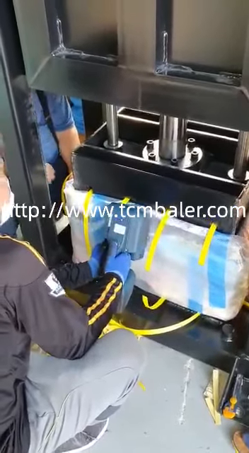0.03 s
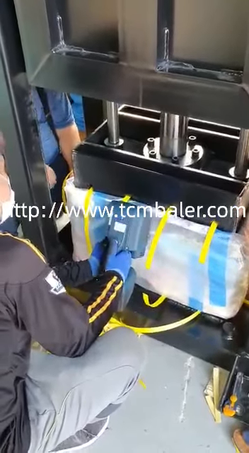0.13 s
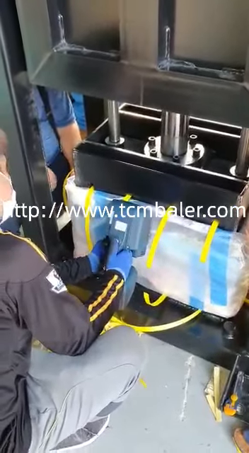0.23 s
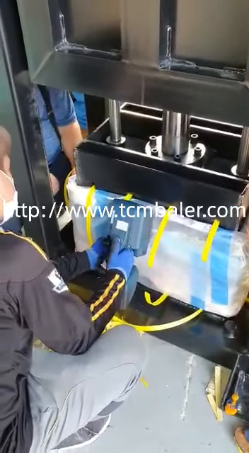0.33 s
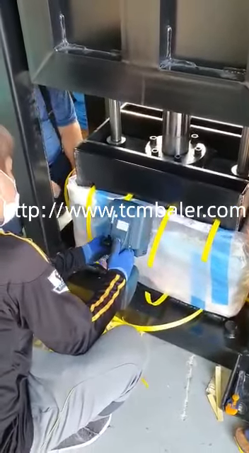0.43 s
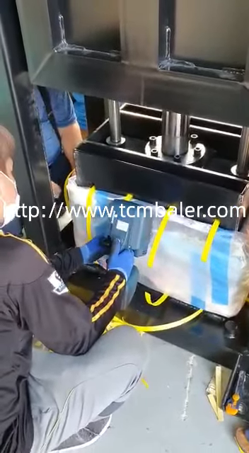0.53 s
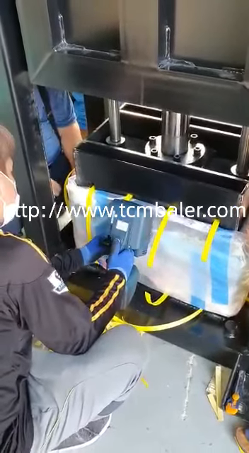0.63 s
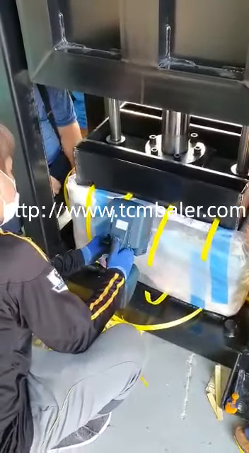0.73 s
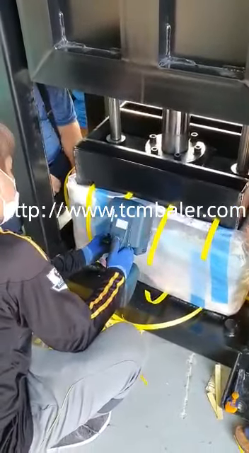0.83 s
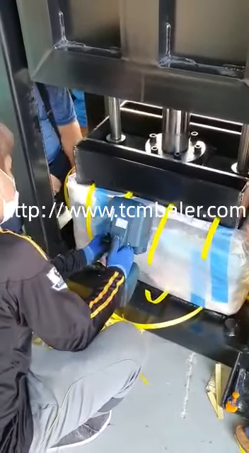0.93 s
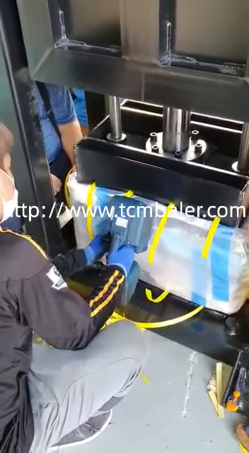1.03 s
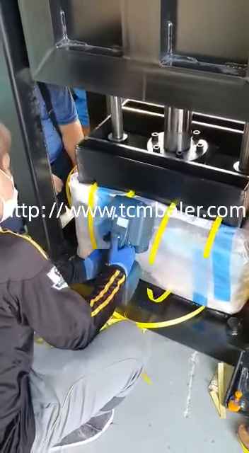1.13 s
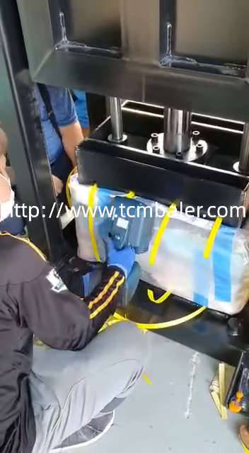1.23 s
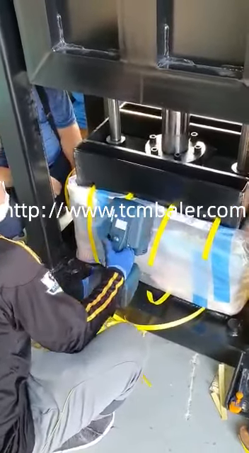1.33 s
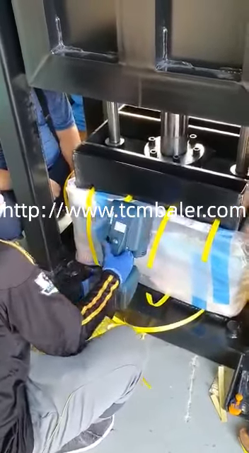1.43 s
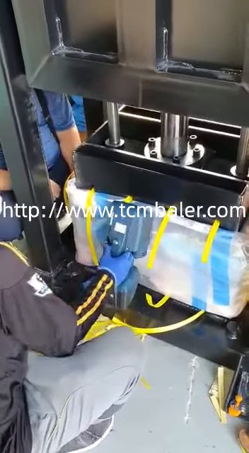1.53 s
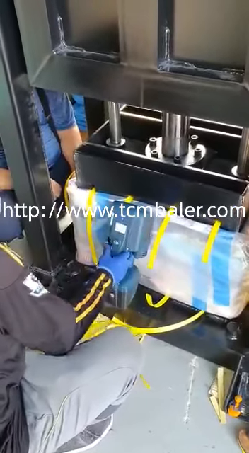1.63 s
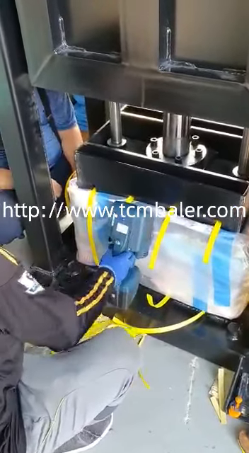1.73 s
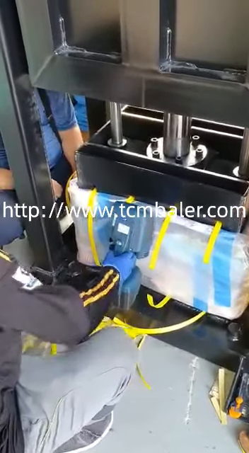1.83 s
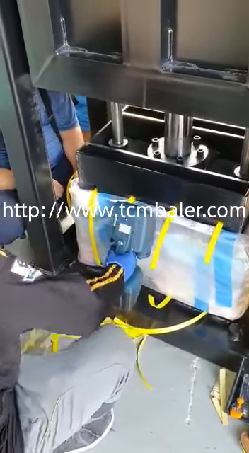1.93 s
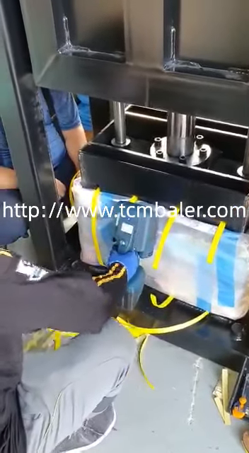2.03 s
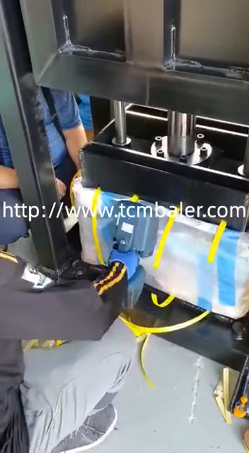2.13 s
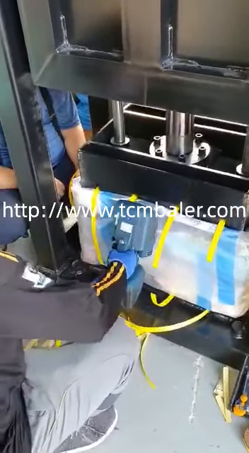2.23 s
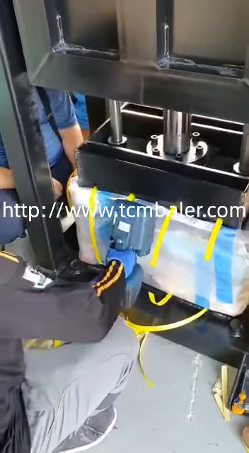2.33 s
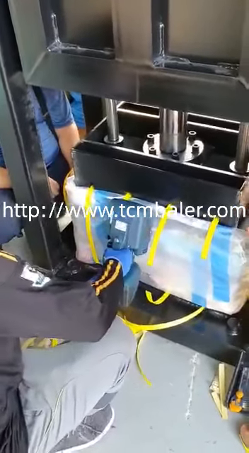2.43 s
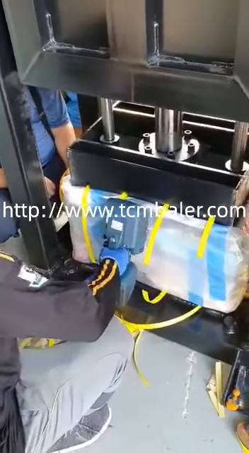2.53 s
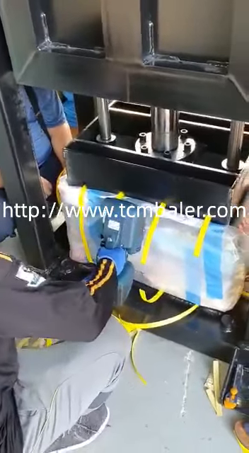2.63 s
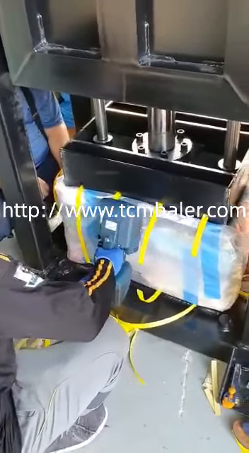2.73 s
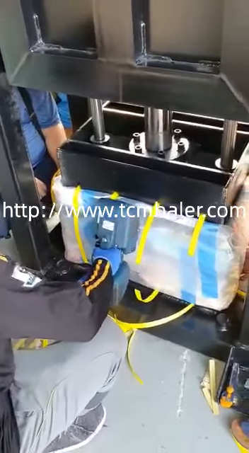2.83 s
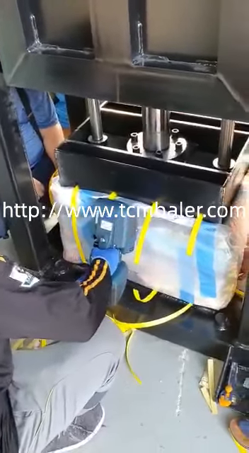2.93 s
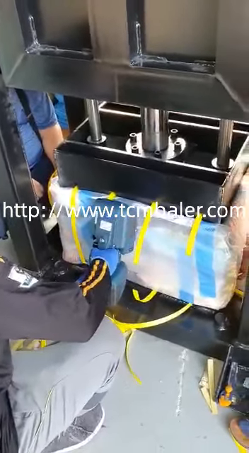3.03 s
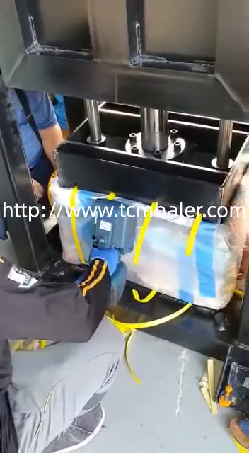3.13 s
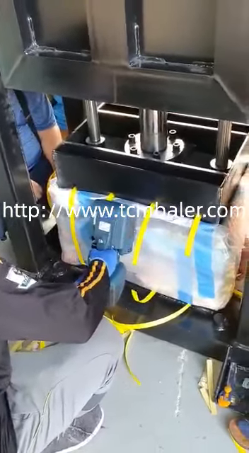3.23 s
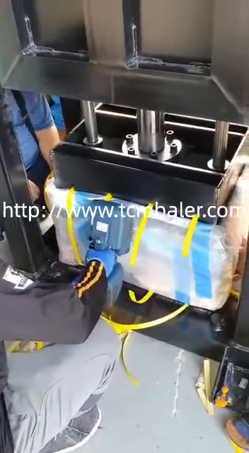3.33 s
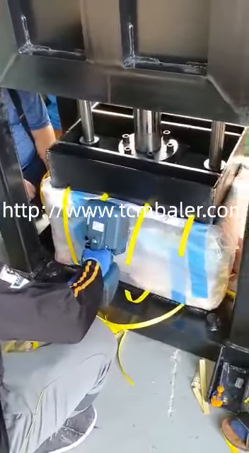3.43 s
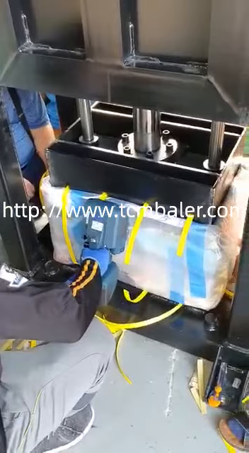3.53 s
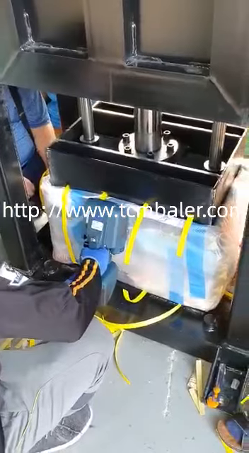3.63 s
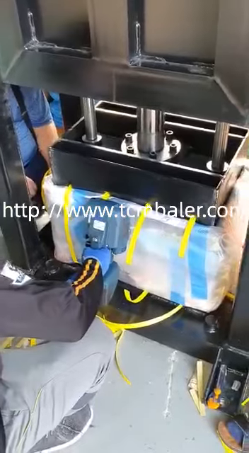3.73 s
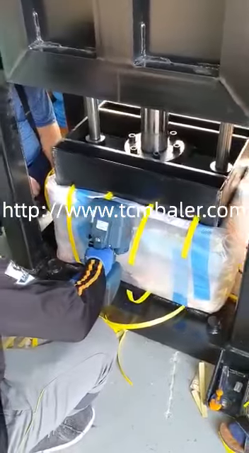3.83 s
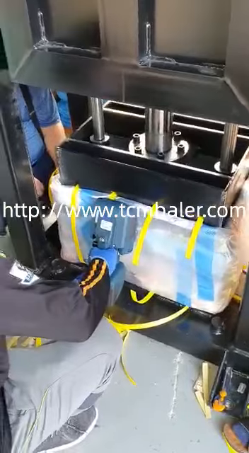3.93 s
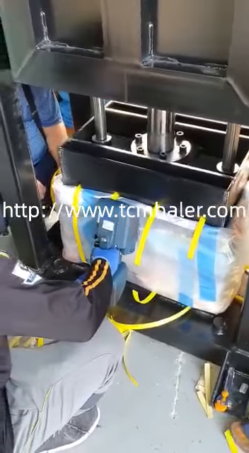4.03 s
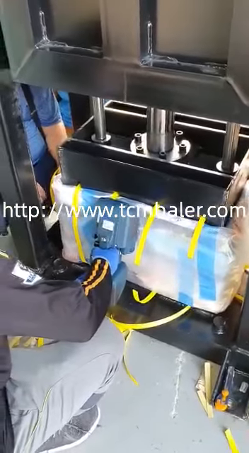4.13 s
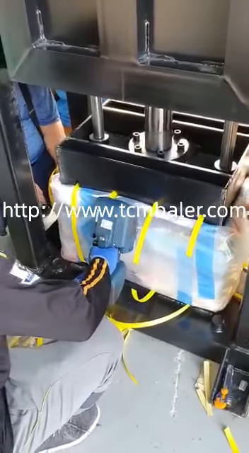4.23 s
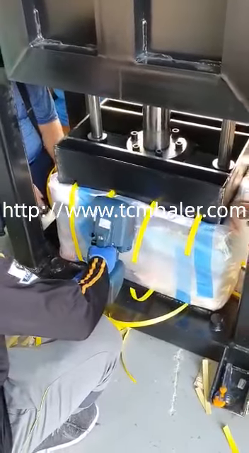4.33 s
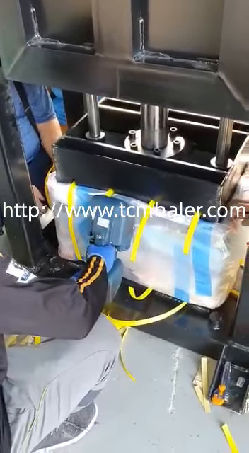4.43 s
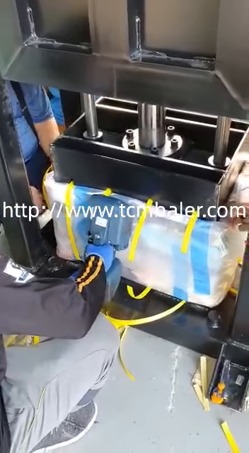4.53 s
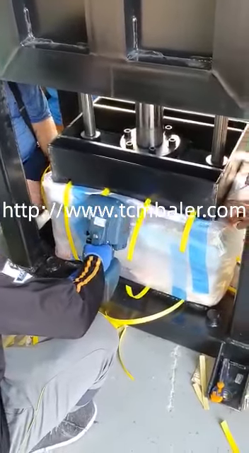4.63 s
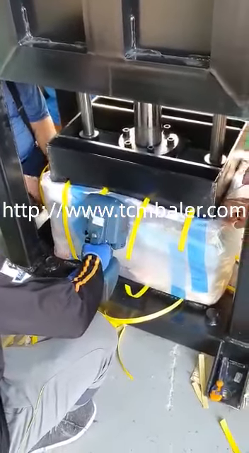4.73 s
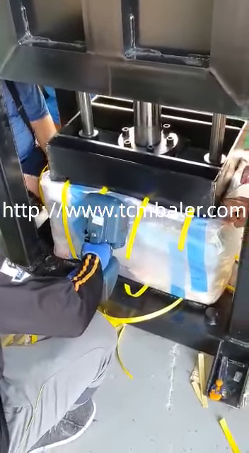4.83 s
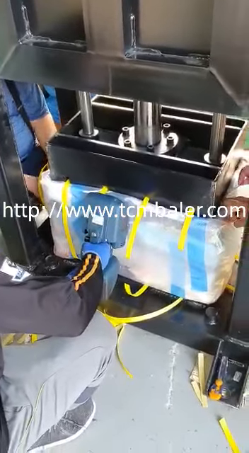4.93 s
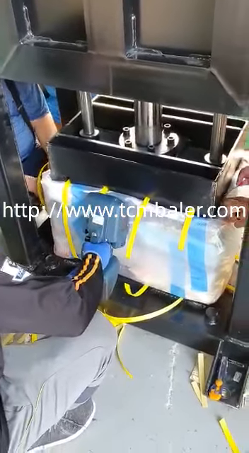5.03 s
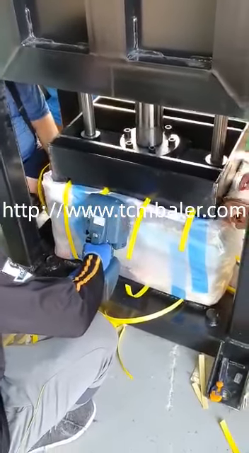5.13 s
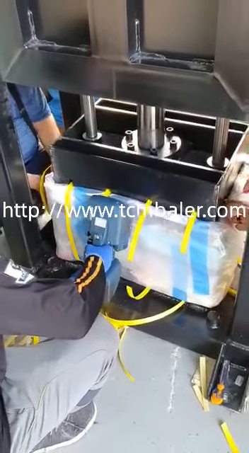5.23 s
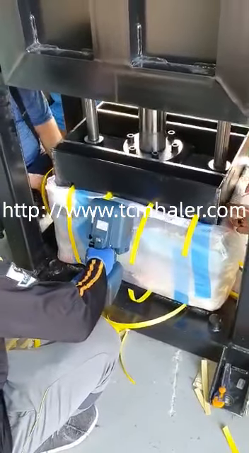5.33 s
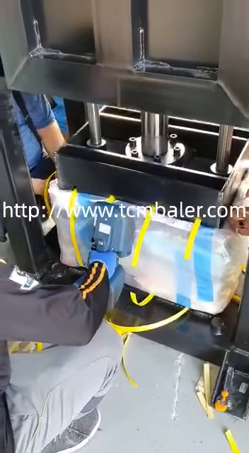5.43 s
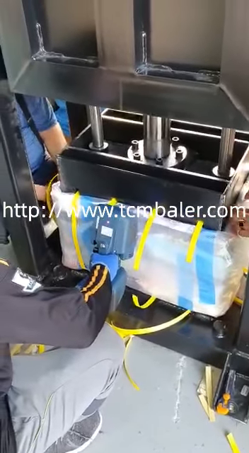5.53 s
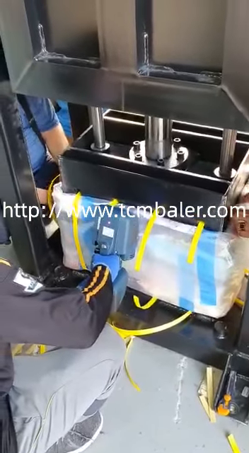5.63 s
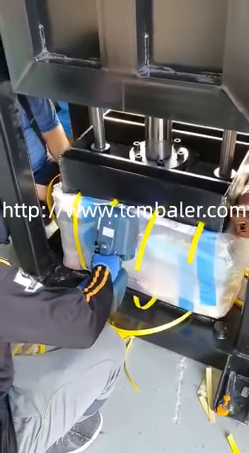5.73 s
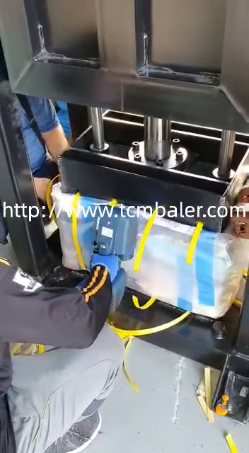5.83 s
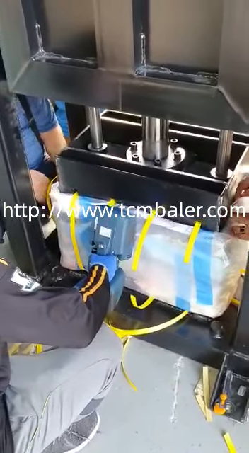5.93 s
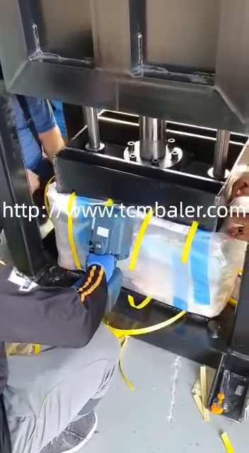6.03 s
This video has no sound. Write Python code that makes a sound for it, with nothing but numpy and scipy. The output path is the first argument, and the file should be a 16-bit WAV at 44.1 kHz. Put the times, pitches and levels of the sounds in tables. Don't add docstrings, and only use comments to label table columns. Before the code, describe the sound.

A near, stereo phone microphone hears a small electric motor pull plastic strap in two bursts, the second dropping in pitch as load rises. Half a second of distant machine hum, a double click, then a hard knock opens a loud vibrating buzz that eases, turns uneven and stuttering, and cuts off. Sparse film crackles follow in a lightly echoing hall.

```python
import sys
import numpy as np
from scipy import signal
from scipy.fft import rfft, irfft
from scipy.io import wavfile
from scipy.ndimage import uniform_filter1d

SR = 44100
rng = np.random.default_rng(int(sys.argv[2]) if len(sys.argv) > 2 else 0)


def level_to_linear(level):
    exponent = np.asarray(level, float) / 20
    return 10 ** exponent


def generate_wav(sig):
    pcm = np.round(np.clip(np.atleast_2d(sig).T, -1, 1) * 32767).astype(np.int16)
    wavfile.write(sys.argv[1], SR, pcm)


N = 268569
T = np.arange(N) / SR


def evened(x):
    return x / np.sqrt(np.mean(x ** 2) + 1e-20)


def read(points, hz):
    f, value = np.transpose(points)
    return np.interp(np.log(hz + 1), np.log(f + 1), value)


def curve(points, t):
    return np.interp(t, *np.transpose(points))


def played(rows):
    s, *columns = np.transpose(rows)
    t = T[(T >= s[0]) & (T < s[-1])]
    return t, [np.interp(t, s, c) for c in columns]


def add(mix, s, sound):
    part = mix[:, round(s * SR):][:, :sound.shape[-1]]
    part += sound[..., :part.shape[1]]


def drift(t, rate_hz, count):
    knots = np.arange(t[0], t[-1] + 2 / rate_hz, .25 / rate_hz)
    rows = uniform_filter1d(rng.standard_normal((count, len(knots))), size=4, axis=1) * 2
    return np.array([np.interp(t, knots, row) for row in rows])


def resonate(x, hz, width_hz):
    b, a = signal.iirpeak(hz, hz / width_hz, SR)
    return signal.lfilter(b, a, x)


# frequency in Hz, correlation 0-1.
LIKENESS = [(60, 0.91), (150, 1), (380, 0.77), (950, 0.22), (2380, 0.045), (5980, 0.31), (15000, 0.78)]


def hiss(t, spectra, share, patchy_db, size=1024):
    hop = size // 4
    hz = np.fft.rfftfreq(size, 1 / SR)
    frames = len(t) // hop + 5
    a, b, c, d, patches = rng.standard_normal((frames, len(hz), 5)).T
    patches = uniform_filter1d(patches, size=4, axis=0)
    patches = evened(uniform_filter1d(patches, size=16, axis=1))
    blend = np.interp(np.arange(frames) * hop, np.arange(len(t)), share * np.ones(len(t)))
    colour_db = sum(np.outer(read(s, hz), np.clip(1 - abs(blend - k), 0, 1))
                    for k, s in enumerate(spectra))
    same = np.clip(read(LIKENESS, hz), -1, 1)[:, None]
    left = a + 1j * b
    right = same * left + np.sqrt(1 - same ** 2) * (c + 1j * d)
    z = np.array([left, right]) * level_to_linear(colour_db + patchy_db * patches)
    return evened(signal.istft(z, nperseg=size, noverlap=size - hop)[1][:, :len(t)])


def orders(t, turns, levels, waver_db, slip, rate_hz):
    out = np.zeros((2, len(t)))
    for k, db in levels:
        both, left, right = drift(t, rate_hz, count=3)
        phase, path = drift(t, 2.5 * rate_hz, count=2)
        spread = .8 * np.clip((k - 1) / 8, .1, 1.1)
        apart_rad = -.21 * max(k - 3, 0) + spread * (rng.standard_normal() + .4 * path)
        angle = 2 * np.pi * (k * turns + rng.random()) + slip * np.sqrt(k) * phase
        angle = angle - np.array([[0], [1]]) * apart_rad
        waver = waver_db * (1 + k / 16) * (both + 0.61 * np.array([left, right]))
        out += np.sqrt(2) * level_to_linear(db + waver) * np.cos(angle)
    return out


def gate(turns, depth):
    return evened(1 + depth * np.cos(2 * np.pi * turns))


# frequency in Hz, width in Hz, level in dB.
HUMS = [(49.8, 4.3, -50.5), (98.3, 2.7, -61), (159.4, 36, -58), (241.5, 17, -53.5)]
# frequency in Hz, density in dB per Hz.
SHOP = [(20, -25), (32, -37), (47, 2.5), (119, -5), (148, -3.5), (202, -12.5), (245, -4.5), (324, -13),
        (534, -9.5), (2000, -16), (2500, -23.5), (5000, -32.5), (9300, -44), (16000, -53)]


def shop():
    wash_db = -40.5 - 1.5 + 0.9 * drift(T, 3, count=1)
    out = level_to_linear(wash_db) * hiss(T, [SHOP], 0, patchy_db=2.0, size=2048)
    for hz, width_hz, db in HUMS:
        hum = resonate(resonate(rng.standard_normal(N), hz, width_hz), hz, width_hz)
        out = out + level_to_linear(db + 1.2 * drift(T, 0.95, count=1)) * evened(hum)
    return out


# time in seconds, effort as brush and gear hiss in dB.
PULLS = [
    [(0, -38.5), (.07, -36.5), (.13, -41.5), (.2, -44), (.26, -57)],
    [(.405, -50), (.43, -39.5), (.46, -36.5), (.74, -36), (.92, -33.5), (1.08, -32.5), (1.16, -33),
     (1.178, -52), (1.2, -64)],
]
# time in seconds, turns per second.
PULL_SPEEDS = [
    [(0, 163), (.1, 161), (.26, 146)],
    [(.4, 142), (.45, 152), (.5, 159), (.58, 158.8), (.7, 154), (.85, 144.5), (1.05, 124), (1.14, 116),
     (1.22, 113)],
]
# multiple of the shaft, level over the hiss in dB.
PULL_ORDERS = [(5, -15), (8, -15), (10, -30), (12, -13), (12.4, -35), (14, -41), (16, -26)]
# frequency in Hz, density in dB per Hz.
PULL_HISS = [(300, -32), (500, -35), (800, -12), (1100, -14.5), (1800, -11.5), (2700, -9.5), (3900, -14),
             (5600, -13), (7200, -14), (8300, -9), (9000, -19.5), (9800, -27), (12500, -22.5), (15500, -27)]
# frequency in Hz, width in Hz, lift in dB.
SWEET_SPOTS = [(640, 60, 16), (1720, 400, 14), (1280, 60, 10), (3260, 600, 20), (2560, 100, 6)]
# frequency in Hz, width in Hz, level over the hiss in dB unloaded, at full load.
CASING = [(657, 79, -3, -9.5), (765, 84, -8.5, -21), (1770, 270, -2.5, -21), (2107, 116, -9.5, -1.5),
          (2530, 330, -46, -6), (5630, 120, -23, -8), (6890, 320, -19, -5.5), (8220, 1030, -18, -2)]


def pull(rows, speed):
    teeth = 11
    t, (hiss_db,) = played(rows)
    shaft = curve(speed, t)
    turns = np.cumsum(shaft) / SR
    sag = np.maximum.accumulate(shaft) - shaft
    load = np.clip(sag / 35, 0, 1)
    double_db = -28 - 16 * np.clip(1 - 20 * load, 0, 1)
    levels = [(k, hiss_db + db) for k, db in PULL_ORDERS]
    for k, db in [(4, -14.5), (teeth, -19.5), (2 * teeth, double_db)]:
        lift_db = sum(peak_db / (1 + (2 * (k * shaft - hz) / width_hz) ** 2)
                      for hz, width_hz, peak_db in SWEET_SPOTS)
        levels.append((k, hiss_db + db + lift_db))
    noise = level_to_linear(2.0) * gate(turns, 0.12) * hiss(t, [PULL_HISS], 0, patchy_db=4.0)
    for hz, width_hz, free_db, loaded_db in CASING:
        chatter = rng.standard_normal((2, len(t))) + 0.49 * rng.standard_normal(len(t))
        ring = evened(resonate(resonate(chatter, hz, width_hz), hz, width_hz))
        noise += level_to_linear(free_db + load * (loaded_db - free_db)) * ring
    tones = orders(t, turns, levels, waver_db=2.0, slip=0.25, rate_hz=20)
    return t[0], (tones + level_to_linear(hiss_db) * noise) * signal.windows.tukey(len(t), .03)


# time in seconds, peak in dB, ring in Hz, snap in dB, contact in ms.
KNOCKS = [
    (0.184, -27.5, 702, -47, 8.2),
    (0.416, -34, 674, -62, 12),
    (0.44, -29, 653, -53, 5.9),
    (1.684, -24, 667, -50, 8.1),
    (1.691, -25, 615, -43.5, 4.2),
    (1.811, -19, 710, -35.5, 2.6),
    (1.825, -8, 700, -20, 2),
    (1.835, 5.5, 642, -29, 5.4),
    (4.194, -27.5, 540, -43, 2.5),
    (4.211, -40, 600, -44, 3.1),
]


def knock(db, hz, snap_db, contact_ms):
    t = np.arange(3000) / SR
    contact_s = contact_ms / 1000
    decay = level_to_linear(-60 * np.maximum(t - contact_s, 0) / 0.037)
    ring = np.clip(t / contact_s, 0, 1) ** 0.85 * decay * np.sin(2 * np.pi * hz * t)
    snap = evened(resonate(rng.standard_normal((2, len(t))), 3000, 2900))
    snap = snap * np.minimum(t / 0.002, 1) * np.exp(-t / 0.0083)
    return level_to_linear(db) * ring + level_to_linear(snap_db + 5.5) * snap


# time in seconds, peak in dB, centre in Hz, length in ms.
TICKS = [(0.271, -51, 7000, 35), (1.3683, -56, 7160, 18), (1.5094, -68, 6890, 18),
         (4.1957, -35.5, 9330, 27), (4.6463, -75, 8120, 18), (4.7714, -51.5, 8270, 20),
         (5.0858, -61, 7050, 18), (5.1294, -58, 8160, 16), (5.4316, -58, 10000, 20),
         (5.5363, -52, 7530, 20), (5.9194, -64, 6830, 16), (5.9374, -55, 6570, 15)]


def tick(db, hz, length_ms):
    t = np.arange(4000) / SR
    burst = evened(resonate(rng.standard_normal((2, len(t))), hz, 0.87 * hz))
    return level_to_linear(db + 0.5) * burst * np.minimum(t / 0.0062, 1) ** 0.45 * np.exp(-t / (length_ms / 1000))


# time in seconds, effort in dB, looseness of the shoe 0-1.
BITE = [(1.81, -9, 0.72), (1.822, -8.5, .4), (1.832, 7.5, 1), (1.88, 5.5, 1), (1.92, 6, 0.03),
        (2.04, 2.6, 0.47), (2.12, 2.5, 0.59), (2.27, -1, 0.73), (2.31, 1.5, 0.2)]
RUB = [(2.499, 0.69, 0.054), (2.64, -0.47, 0.23), (2.72, 0, 0.66), (2.8, -0.15, 0.18), (3.0, -1.1, 0.55),
       (3.22, 0.84, 0.52), (3.5, -1.22, 0.53), (3.6, 0.93, 0.54), (3.953, 0.34, 0.77)]
# time in seconds, turns per second.
WELD_SPEED = [(1.8, 130), (1.85, 150), (1.88, 168), (1.9, 178), (1.94, 181.5), (2.1, 181.2), (2.2, 182.3),
              (2.27, 183.8), (2.31, 189),
              (2.36, 193.6), (2.52, 195.4), (2.68, 193.4), (3.0, 196.3), (3.12, 196.6), (3.24, 198.9),
             (3.4, 199.4), (3.54, 198), (3.95, 198.2)]
# time in seconds, stage (0 biting, 1 sliding, 2 warming, 3 melting).
STAGE = [(2.268, 0.032), (2.285, 0.29), (2.34, 0.64), (2.72, 0.72), (2.92, 2.27), (3.1, 2.12), (3.22, 2.39)]
MELT_SHARE = (0, 1, 1.1, 1.8)
# frequency in Hz, density in dB per Hz.
BITE_HISS = [(40, -42), (130, -30.5), (300, -38), (450, -69), (620, -7), (900, -20), (2000, -12.5),
             (2800, -19.5), (5000, -23), (8500, -27), (9500, -30), (12800, -33), (13800, -34), (15500, -31)]
SLIDE_HISS = [(40, -44), (130, -40), (330, -52), (600, -25), (950, -36), (1650, -28.5), (2200, -29),
              (2800, -35), (3500, -32), (4600, -28), (5800, -33), (8000, -25.5), (9500, -31), (15500, -34)]
MELT_HISS = [(40, -29), (130, -37), (330, -59), (600, -2), (800, -19), (1050, -32), (1650, -10),
             (2150, -11.5), (3000, -14.5), (4600, -24.5), (8500, -33), (9500, -35), (12800, -36.5),
             (15500, -39)]
# level in dB biting, sliding, warming, melting, sticking.
SHOE_ORDERS = [(-54.0, -54.0, -48.0, -41.0, -46.0), (-43.0, -48.0, -53.0, -59.0, -60.0),
               (-21.0, -31.0, -25.0, -19.0, -21.0), (-26.0, -36.0, -35.0, -26.0, -29.0),
               (-38.0, -43.0, -31.0, -36.0, -34.0), (-27.0, -31.0, -33.0, -40.0, -43.0),
               (-27.0, -48.0, -43.0, -33.0, -36.0), (-30.0, -38.0, -33.0, -31.0, -37.0),
               (-35.0, -38.0, -37.0, -34.0, -39.0), (-37.0, -46.0, -37.0, -41.0, -36.0),
               (-28.0, -33.0, -33.0, -34.0, -46.0), (-60.0, -41.0, -37.0, -42.0, -50.0),
               (-37.0, -60.0, -45.0, -48.0, -40.0), (-52.0, -27.0, -36.0, -56.0, -50.0),
               (-35.0, -42.0, -43.0, -49.0, -59.0), (-43.0, -44.0, -42.0, -46.0, -41.0),
               (-42.0, -41.0, -40.0, -60.0, -60.0), (-46.0, -40.0, -37.0, -42.0, -37.0),
               (-47.0, -37.0, -41.0, -49.0, -49.0), (-55.0, -43.0, -39.0, -53.0, -50.0),
               (-60.0, -49.0, -41.0, -45.0, -56.0), (-51.0, -43.0, -55.0, -55.0, -52.0),
               (-45.0, -35.0, -42.0, -53.0, -58.0), (-52.0, -38.0, -40.0, -57.0, -48.0),
               (-59.0, -41.0, -45.0, -47.0, -49.0), (-47.0, -40.0, -34.0, -43.0, -54.0),
               (-42.0, -48.0, -49.0, -56.0, -55.0), (-49.0, -52.0, -44.0, -53.0, -60.0),
               (-39.0, -38.0, -37.0, -60.0, -60.0), (-60.0, -39.0, -47.0, -47.0, -53.0),
               (-50.0, -37.0, -38.0, -46.0, -56.0), (-58.0, -57.0, -48.0, -60.0, -54.0)]
# time in seconds, column of SHOE_ORDERS.
SHOE_STAGE = [(2.268, 0), (2.29, .6), (2.34, 1), (2.56, 1), (2.7, 2), (3.12, 2), (3.22, 3), (3.44, 3),
              (3.54, 4)]
# multiple of the shaft, level under order 3.5 in dB.
HALF_ORDERS = [(2.5, -24), (4.5, -22), (5.5, -27), (6.5, -26), (7.5, -25), (8.5, -21), (9.5, -23),
               (10.5, -21), (13.5, -21)]
# time in seconds, change of the third order in dB.
JOLTS = [(2.628, -7), (2.643, 0), (2.661, 5), (2.679, -18), (2.693, 7), (2.709, 10), (2.716, -4),
         (2.724, 4), (2.767, 10), (2.842, 8.5), (2.861, 1), (2.889, 9), (2.902, -14), (2.919, 6.5),
         (2.934, -20), (3.01, 5.5), (3.025, 10.5), (3.041, 3.5), (3.056, 0), (3.085, -7), (3.124, 6.5),
         (3.139, -7), (3.158, -10), (3.177, 6), (3.185, -16), (3.192, 6), (3.217, 6), (3.239, -5),
         (3.317, 7.5), (3.346, 3.5), (3.438, 0), (3.561, 3.5), (3.59, -1), (3.622, -26), (3.682, -19),
         (3.71, 1), (3.73, 1), (3.757, -12), (3.775, -6), (3.782, 3), (3.815, -6), (3.889, -5), (3.92, -15),
         (3.944, 2.5), (3.957, -5), (3.976, 8), (4.012, -8), (4.026, 15)]
# frequency in Hz, width in Hz, level in dB.
HOUSING = [(661, 52, -3.5), (600, 67, -6), (680, 68, -20.5)]


def weld():
    jam_s, skip_s = .0055, .0035
    run_down_db_per_s, coast_db, coast_end_s = 207, -23.5, 4.19
    stop = RUB[-1]
    t, (effort_db, loose) = played(BITE + RUB + [(coast_end_s, *stop[1:])])
    fall_db = -run_down_db_per_s * np.maximum(t - stop[0], 0)
    coasting_db = np.maximum(fall_db, coast_db)
    effort_db = effort_db + coasting_db
    shaft = curve(WELD_SPEED, t) + 0.44 * coasting_db
    turns = np.cumsum(shaft) / SR
    stage = curve(STAGE, t)

    def staged(values):
        return np.interp(stage, np.arange(len(values)), values)

    hiss_db = effort_db + staged((-27, -23.5, -21.5, -30))
    third_db = effort_db + staged((-13.5, -30.5, -23.5, -11))
    uncaught = np.clip(1 - (t - t[0]) / 0.088, 0, 1)
    third_db = third_db - 47 * uncaught
    jolt_db = sum(db * np.exp(-((t - s) / (jam_s if db > 0 else skip_s)) ** 2) for s, db in JOLTS)
    half_db = -21 + 16 * loose
    stick_db = 10.5 * np.clip((t - 3.56) / 0.031, 0, 1)
    column = curve(SHOE_STAGE, t)
    levels = [(3, third_db + jolt_db), (3.5, third_db + half_db)]
    levels += [(k, third_db + half_db + db + stick_db) for k, db in HALF_ORDERS]
    for k, db in enumerate(SHOE_ORDERS, 1):
        if k != 3:
            levels.append((k, effort_db - 4.1 * uncaught + np.interp(column, np.arange(len(db)), db)))
    tones = orders(t, turns, levels, waver_db=.9, slip=.07, rate_hz=7)

    share = np.clip(staged(MELT_SHARE), 0, 2)
    rub = hiss(t, [BITE_HISS, SLIDE_HISS, MELT_HISS], share, patchy_db=2.5)
    noise = level_to_linear(hiss_db + 3.0) * gate(turns, 0.12) * rub

    slaps = np.clip(rng.standard_normal(len(t)), -2, 2) * (rng.random(len(t)) < 600 / SR)
    rattle = evened(sum(level_to_linear(db) * resonate(resonate(slaps, hz, width_hz), hz, 3 * width_hz)
                        for hz, width_hz, db in HOUSING))
    rattle_db = -49 + 32 * loose + 1.8 * np.minimum(fall_db + 7, 0)
    rattle = level_to_linear(rattle_db + 2.0) * rattle

    effort = level_to_linear(5.5 * np.clip(1 - stage, 0, 1) * np.clip((t - 1.83) / 0.038, 0, 1))
    running = np.clip((4.05 - t) / 0.14, 0, 1)
    return t[0], effort * (running * tones + noise + rattle) * signal.windows.tukey(len(t), .004)


# frequency in Hz, t60 in seconds.
HALL = [(300, 0.12), (1000, 0.64), (4000, 0.53), (8000, 0.3)]


def hall(x):
    taps = rng.choice([-1., 1.], (2, SR // 2)) * (rng.random((2, SR // 2)) < .05)
    taps[:, :300] = 0
    hz, t, z = signal.stft(taps, SR, nperseg=256)
    tail = signal.istft(z * level_to_linear(-60 * t / read(HALL, hz)[:, None]), SR, nperseg=256)[1]
    return signal.fftconvolve(x, tail / np.linalg.norm(tail[0]), axes=1)[:, :N]


def scene():
    tool = np.zeros((2, N))
    for rows, speed in zip(PULLS, PULL_SPEEDS):
        add(tool, *pull(rows, speed))
    for s, *blow in KNOCKS:
        add(tool, s, knock(*blow))
    for s, *crackle in TICKS:
        add(tool, s - .006, tick(*crackle))
    add(tool, *weld())
    tool[1] = np.roll(tool[1], 8)
    return tool + level_to_linear(-12.0) * hall(tool) + shop()


# frequency in Hz, margin under the neighbours at which a band is dropped in dB.
MARGIN = [(2200, 6.5), (6000, 5), (9000, 3.8), (15000, 2.6)]


def masked_out(x, band=8):
    window = np.sin(np.pi * (np.arange(2048) + .5) / 2048)
    hz, _, z = signal.stft(x, SR, window, nperseg=2048, noverlap=1024)
    power = np.add.reduceat(abs(z) ** 2, np.arange(0, len(hz), band), axis=1)
    power = uniform_filter1d(power, size=2, axis=2)
    mask = uniform_filter1d(power, size=17, axis=1) / level_to_linear(2 * read(MARGIN, hz[::band]))[:, None]
    keep = (power > mask)[:, np.arange(len(hz)) // band] | (hz < MARGIN[0][0])[:, None]
    return signal.istft(z * keep, SR, window, nperseg=2048, noverlap=1024)[1][:, :N]


# frequency in Hz, left minus right in dB.
PORTS = [(60, -0.5), (300, -1), (600, -1), (1200, -2), (1900, -4), (2800, 1), (4400, 1), (6400, 10),
         (8000, 19.5), (9600, 4), (11500, 25), (12600, 50), (13600, 54), (15500, 56)]


def top_cut(x):
    return signal.sosfilt(signal.butter(12, 15720, fs=SR, output="sos"), x)


def record(dry):
    hz = np.fft.rfftfreq(N, 1 / SR)
    lean = level_to_linear(2 * read(PORTS, hz))
    same = np.clip(read(LIKENESS, hz), 0, 1)
    ports = np.sqrt(np.array([lean, np.ones_like(lean)]) / (1 + lean) * 4 / (1 + same))
    band = (hz < 15720) / (1 + (32 / (hz + 1)) ** 3)
    heard = irfft(rfft(dry) * ports * band, N)
    power_db = 10 * np.log10(abs(uniform_filter1d((heard ** 2).mean(0), size=1300)) + 1e-12)
    fall_db = T * 16.2
    held_db = np.maximum.accumulate(power_db + fall_db) - fall_db
    over_db = np.maximum(held_db + 16.5, 0)
    ducked = heard / level_to_linear(0.71 * uniform_filter1d(over_db, size=300))
    mix = masked_out(ducked)
    return top_cut(mix)


dry = scene()
out = record(dry)
generate_wav(out)
```